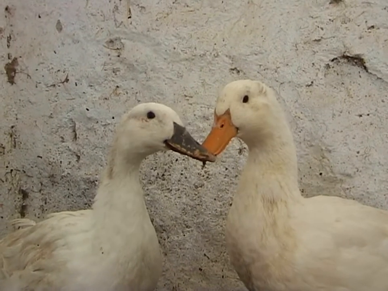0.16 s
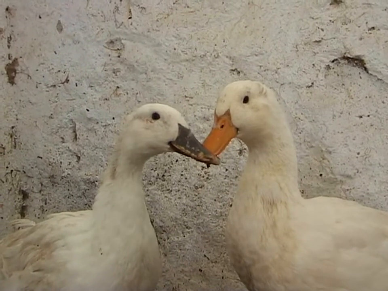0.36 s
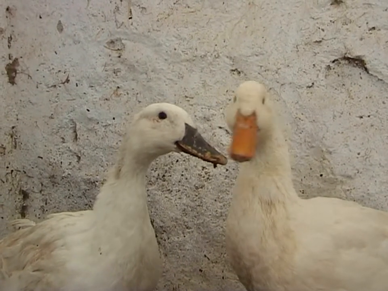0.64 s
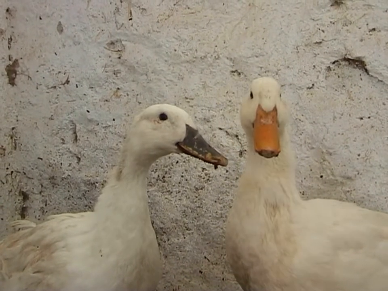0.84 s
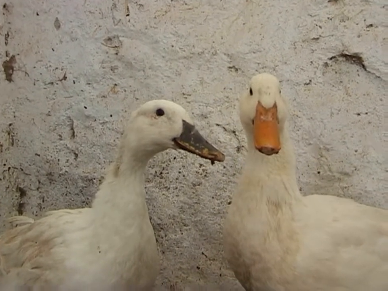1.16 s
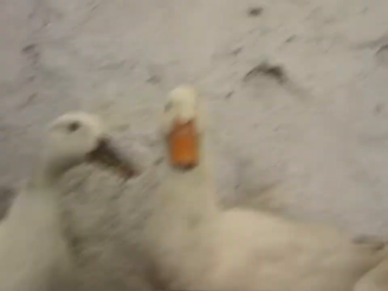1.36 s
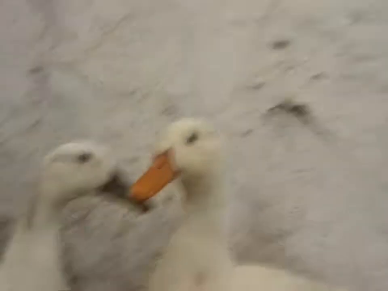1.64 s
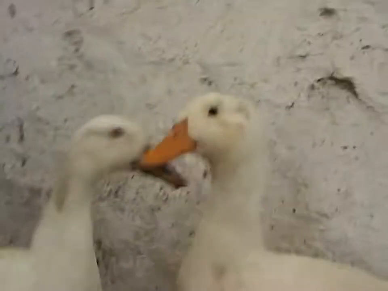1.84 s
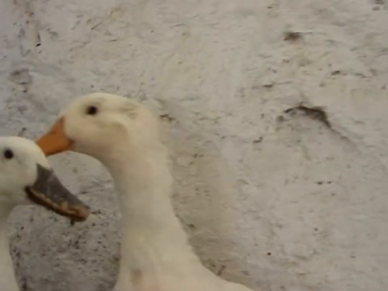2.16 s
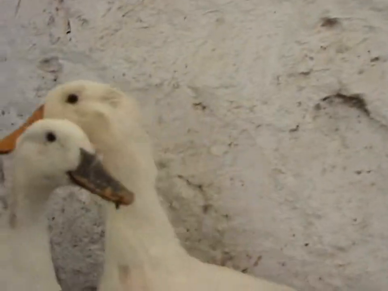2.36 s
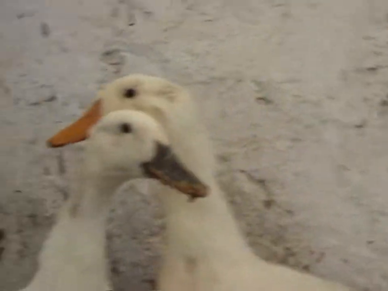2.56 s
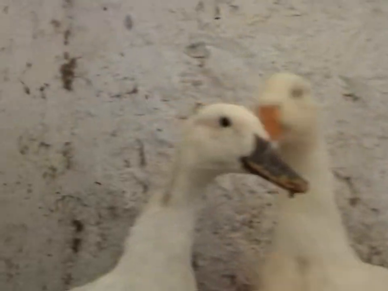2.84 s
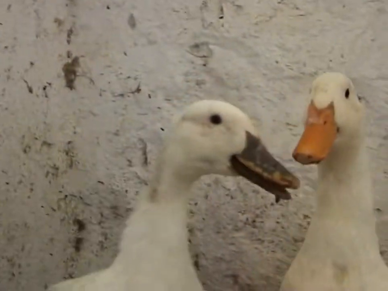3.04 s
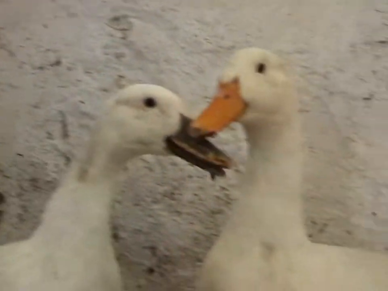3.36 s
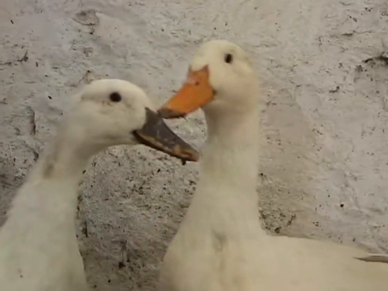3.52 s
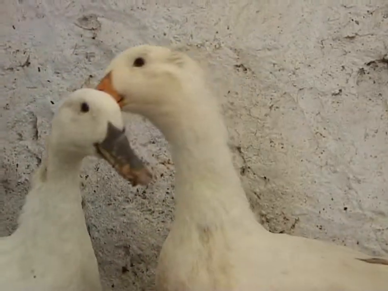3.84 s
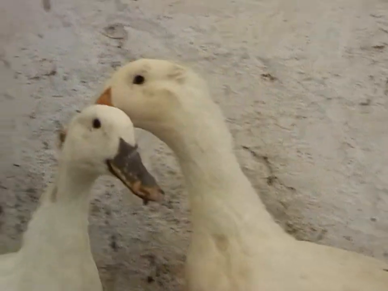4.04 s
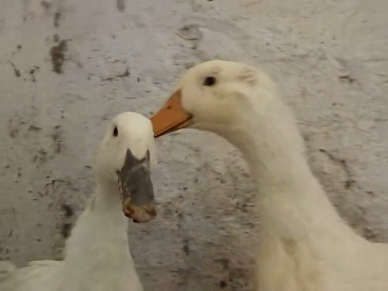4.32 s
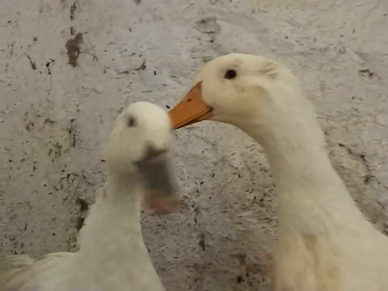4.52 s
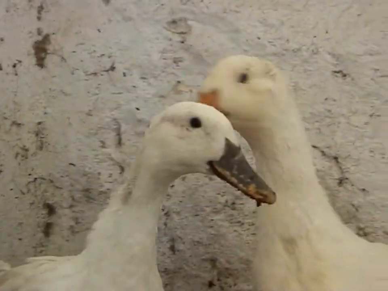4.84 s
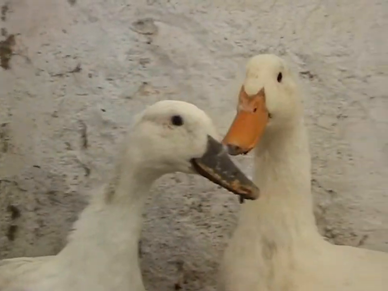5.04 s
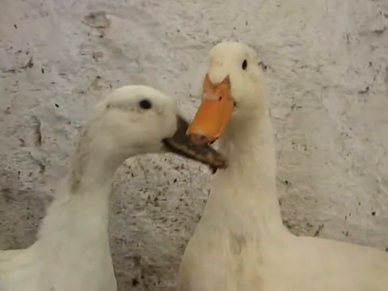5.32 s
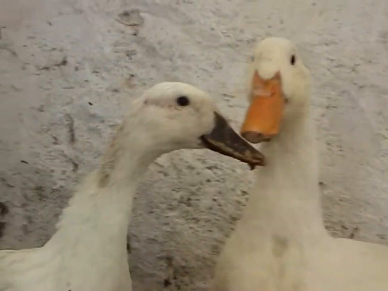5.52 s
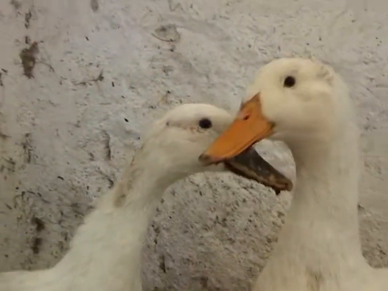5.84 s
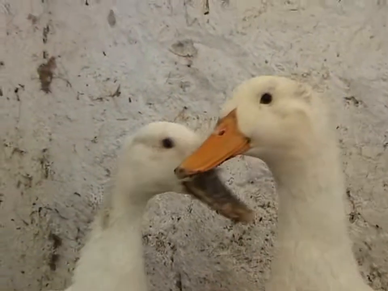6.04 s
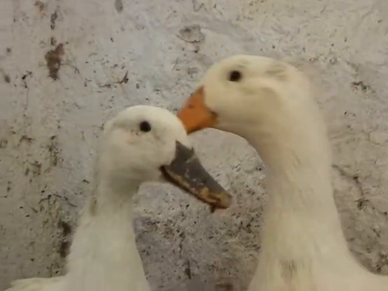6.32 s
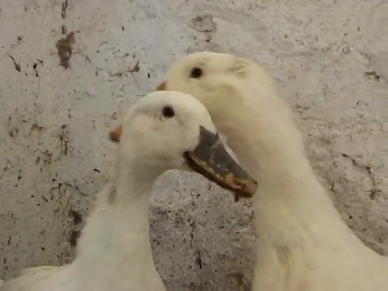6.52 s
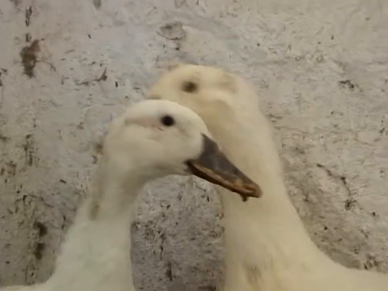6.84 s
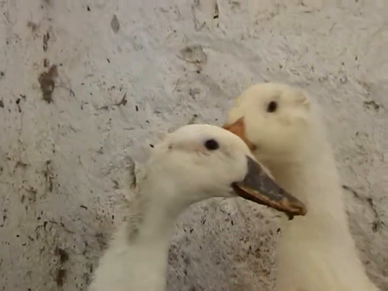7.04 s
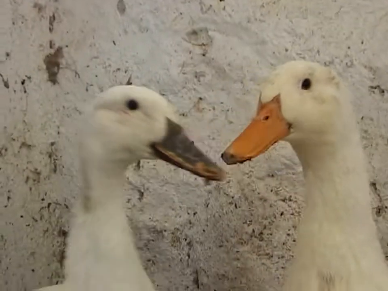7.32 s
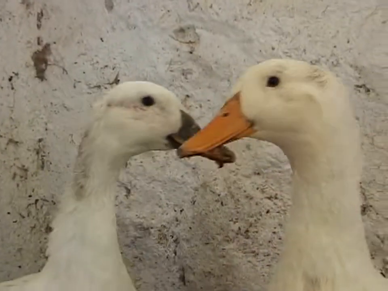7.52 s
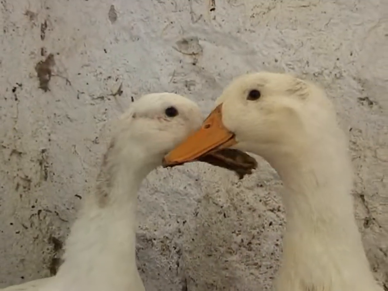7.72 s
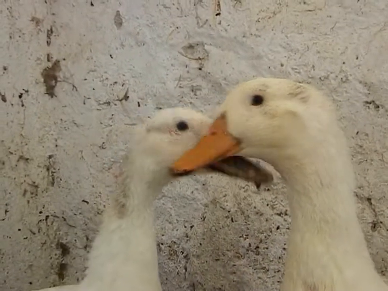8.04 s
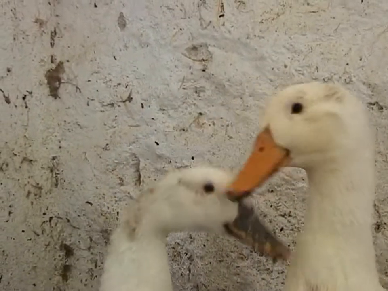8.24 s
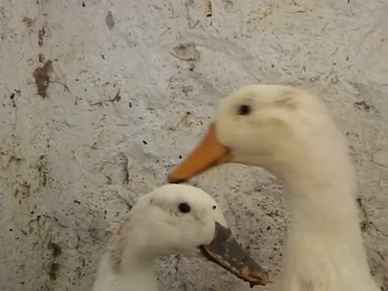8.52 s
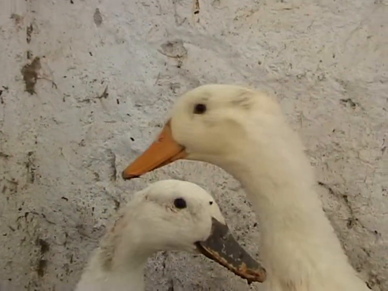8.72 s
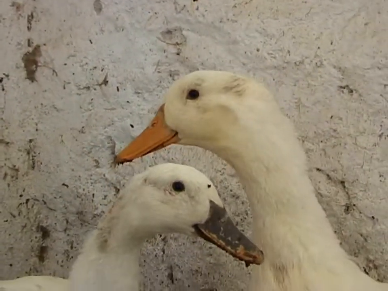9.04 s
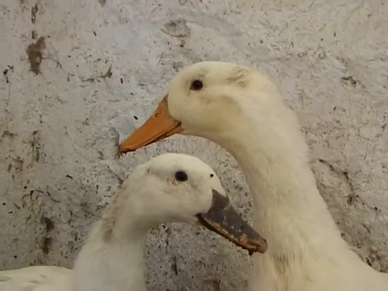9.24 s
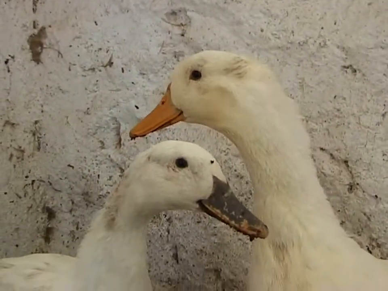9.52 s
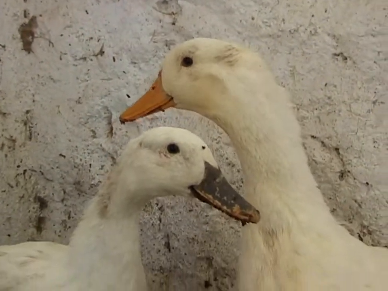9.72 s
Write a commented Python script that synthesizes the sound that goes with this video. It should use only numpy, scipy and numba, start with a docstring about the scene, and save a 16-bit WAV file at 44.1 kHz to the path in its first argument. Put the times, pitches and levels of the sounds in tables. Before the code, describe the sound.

Wind rumble and camera thumps give way to bright, brisk duck quacks in two bursts, interleaved with a drake's low breathy rasping, over faint hiss.

```python
"""A yard beside a plastered wall: a duck quacks in two runs, a drake answers with a quieter rasp.
Both voices are uneven membrane pulses and puffs of air through moving windpipe modes; the yard rings briefly.
Wind, thumps and rustling hands act on a small camera, whose electronics add hiss and two faint combs of tones.
Knocks and ticks are damped noise bursts; a far moan, a squeak and a hollow note are wavering sines,
and a narrow treble hiss is shaped noise."""
import sys
import numpy as np
from scipy import signal
from scipy.fft import rfft, irfft, next_fast_len
from scipy.io import wavfile
from scipy.ndimage import uniform_filter1d, map_coordinates
from numba import njit

SR = 44100
rng = np.random.default_rng(int(sys.argv[2]) if len(sys.argv) > 2 else 0)


def transcribe(u):
    """Save the signal u as a 16-bit wav file named by the first command-line argument.

    u: samples, shape (n,) or (channels, n), limited to [-1, 1]; the rate is SR.
    q: integer samples, one column per channel.
    """
    v = np.clip(np.atleast_2d(u).T, -1, 1)
    q = np.round(v * 32767).astype(np.int16)
    wavfile.write(sys.argv[1], SR, q)


N = 435708
T = np.arange(N) / SR
CALL_SAMPLES = SR // 5  # working length of one call


def undb(db):
    """Decibels to amplitude."""
    return 10 ** (np.asarray(db, float) / 20)


def unit(x):
    """Scale to an RMS of 1."""
    return x / np.sqrt(np.mean(x ** 2))


def ring(x, modes):
    """Sum of two-pole resonances, neighbours in opposite sign as in a pipe."""
    out = 0
    for k, (hz, width_hz, db) in enumerate(modes):
        b, a = signal.iirpeak(hz, hz / width_hz, SR)
        out = out + (-1) ** k * undb(db) * signal.lfilter(b, a, x)
    return out


def coloured(points):
    """Unit-RMS noise with a spectrum of (frequency [Hz], density [dB per Hz]) points."""
    hz, db = np.transpose(points)
    size = next_fast_len(N)
    bin_hz = np.arange(size // 2 + 1) * SR / size
    gain = undb(np.interp(np.log(bin_hz + 1e-3), np.log(hz), db))
    return unit(irfft(rfft(rng.standard_normal(size)) * gain, size)[:N])


def window(start_s, length_s, edge_s):
    """Gate with soft edges inside its length."""
    return np.clip(np.minimum(T - start_s, start_s + length_s - T) / edge_s, 0, 1)


def curve(table):
    """A gate open only inside the table, then its columns interpolated over time."""
    s, *columns = np.transpose(table)
    gate = window(s[0], s[-1] - s[0], 0.019)
    return [gate] + [np.interp(T, s, c) for c in columns]


def walk(rate_hz):
    """Slow smooth chance, spread near 1."""
    k = int(SR / rate_hz)
    steps = np.repeat(rng.standard_normal(N // k + 1), k)
    return 1.3 * uniform_filter1d(uniform_filter1d(steps, k), k)[:N]


def add(out, start_s, x):
    """Mix x into out at a time."""
    i = int(start_s * SR)
    out[i:i + len(x)] += x[:N - i]


def tone(hz, rms_db):
    """Sine of fixed or moving pitch."""
    return np.sqrt(2) * undb(rms_db) * np.sin(2 * np.pi * np.cumsum(hz) / SR)


# hiss spectrum: (frequency [Hz], density [dB per Hz])
FLOOR_COLOUR = [(36, -65.5), (41, -25.5), (60, -4), (87, -10), (299, -16), (475, -22), (775, -26),
                (2210, -34.5), (2370, -33), (2540, -35), (4230, -37.5), (5590, -38), (6580, -37.5),
                (15600, -41)]
FLOOR_DB = -65
CLOCK_HZ, CLOCK_DB = 263.78, -88.5
MOTOR_HZ, MOTOR_DB, MOTOR_CENTRE_HZ, MOTOR_FALL_DB_PER_KHZ = 300.03, -88.5, 5570, 4


def electronics():
    """Hiss, odd multiples of a clock tone, and a motor comb strongest in the mid treble."""
    out = undb(FLOOR_DB + .5 * walk(1.7)) * coloured(FLOOR_COLOUR)
    steady = np.ones(N)
    for k in range(3, 60, 2):
        partial = tone(k * CLOCK_HZ * steady, CLOCK_DB - .04 * k)
        out += np.roll(partial, k * k)  # spreads the phases
    for k in range(10, 38):
        db = MOTOR_DB - MOTOR_FALL_DB_PER_KHZ * abs(k * MOTOR_HZ - MOTOR_CENTRE_HZ) / 1000
        out += tone(k * MOTOR_HZ * steady, db + 3 * walk(2))
    return out


# wind on the microphone, strongest while the camera swings: (time [s], level before gusts [dB])
WIND_LEVEL = [(0, -54), (.7, -48), (1.02, -60), (1.24, -39.5), (1.72, -35), (1.88, -42), (2.1, -38.5),
              (2.45, -42), (2.55, -51.5), (3.6, -60), (4.35, -51.5), (5, -51.5), (5.7, -51), (6.05, -53.5),
              (6.9, -50.5), (8, -55.5), (9.88, -48.5)]
# wind spectrum: (frequency [Hz], density [dB per Hz])
WIND_COLOUR = [(3.5, -30), (6.0, 2.5), (16, 7), (32, -1.5), (77, -29), (160, -36), (210, -63), (400, -91)]
GUST_DB, GUSTS_PER_S = 5.5, 7.4


def wind():
    """Low turbulence noise straight on the microphone, its level wandering in gusts."""
    _, db = curve(WIND_LEVEL)
    return undb(db + GUST_DB * walk(GUSTS_PER_S)) * coloured(WIND_COLOUR)


def waver_and_flutter():
    """Slow random factors for the pitch and level of a faint tone."""
    return 1 + 0.0197 * walk(45), undb(2.5 * walk(30.33))


# moan notes: (time [s], length [s], pitch before waver [Hz],
#              first partial [dB], second partial [dB], fourth partial [dB])
MOAN_NOTES = [(.385, 0.12, 268, -68.5, -69, -88), (0.547, 0.36, 262, -77, -71, -83),
              (0.968, .18, 278, -85, -72, -76), (1.142, 0.13, 264, -80, -70, -74.5),
              (1.296, 0.3, 262, -78, -70, -75)]
MOAN_EDGE_S, MOAN_THIRD_DB = 0.019, -10  # third partial relative to the first


def moan():
    """A faint far moan in separate notes of four harmonics."""
    out = np.zeros(N)
    waver, flutter = waver_and_flutter()
    for s, length_s, hz, first_db, second_db, fourth_db in MOAN_NOTES:
        partials_db = [first_db, second_db, first_db + MOAN_THIRD_DB, fourth_db]
        note = sum(tone(k * hz * waver, db) for k, db in enumerate(partials_db, 1))
        out += window(s, length_s, MOAN_EDGE_S) * flutter * note
    return out


# growing bed of hands on the camera: (time [s], high part [dB], low part [dB]), before grain
RUSTLE_BED = [(.9, -97, -79), (1.22, -89, -79), (1.34, -74.5, -67.5), (1.7, -67, -65.5), (2.1, -68, -58)]
# finger rubs over that bed: (time [s], high part [dB], low part [dB]), before grain
FINGER_RUBS = [(1.25, -77, -78), (1.36, -59.5, -66), (1.63, -71, -62), (1.832, -55.5, -45.5),
               (1.99, -56, -56.5)]
RUB_RISE_MS, RUB_FALL_MS = 14, 48


def rustle():
    """Skin friction: grainy high and low noise, a growing bed with swelling rubs."""
    gate, high_db, low_db = curve(RUSTLE_BED)
    level = gate * undb([high_db, low_db])
    for s, *db in FINGER_RUBS:
        ms = (T - s) * 1000
        level = level + undb(db)[:, None] * np.exp(np.minimum(ms / RUB_RISE_MS, -ms / RUB_FALL_MS))
    grain = undb(1.3 * walk(90))
    high = coloured([(1500, -12), (2500, 4), (6000, -1), (10000, -0.5), (15000, -14)])
    low = coloured([(100, 3), (200, 4.5), (700, 2.0), (2200, -3.0), (3500, -33)])
    return grain * (level[0] * high + level[1] * low)


# thumps on the camera body: (time [s], level before the fade [dB], inverse of duration [Hz])
BODY_THUMPS = [(1.241, -38, 69), (1.354, -51, 70), (1.725, -25.5, 71), (1.94, -28, 69.4),
               (4.247, -37, 70.4)]


def thumps():
    """Each thump is one fading sine cycle, slightly faster at its start."""
    out = np.zeros(N)
    for s, db, hz in BODY_THUMPS:
        u = np.arange(int(SR / hz)) * hz / SR
        add(out, s - .004, undb(db) * np.sin(2 * np.pi * u ** 0.92) * (1 - u))
    return out


# narrow treble hiss: (time [s], level [dB])
HIGH_HISS_LEVEL = [(1.4, -92), (1.6, -70.5), (2.3, -67.5), (2.45, -76), (3.3, -100), (4.6, -80),
                   (5.32, -82), (5.5, -88), (6.2, -99)]


def high_hiss():
    """Noise in a narrow band around 11 kHz."""
    gate, db = curve(HIGH_HISS_LEVEL)
    colour = [(9000, -43.0), (10800, -2.5), (11800, 0.5), (12500, -9.5), (13500, -37.0)]
    return gate * undb(db) * coloured(colour)


# thin high ticks: (time [s], dry peak [dB], decay constant [ms])
TICK_TABLE = [(1.6994, -56, 4), (1.8514, -47, 4), (2.2035, -37, 4.4), (3.1143, -54, 4), (4.0294, -51, 4),
              (4.0544, -64, 4), (5.3467, -42, 3.7)]


def ticks():
    """Tiny bright snaps: short noise bursts through one broad treble resonance."""
    out, t = np.zeros(N), np.arange(SR // 20) / SR
    for s, db, decay_ms in TICK_TABLE:
        burst = rng.standard_normal(len(t)) * np.exp(-1000 * t / decay_ms)
        snap = ring(burst, [(10300, 7300, 0)])
        add(out, s, undb(db) * snap / np.max(abs(snap)))
    return out


# yard tail: (frequency [Hz], T60 [s], colour [dB])
YARD_TAIL = [(198, 0.78, -3), (503, 0.61, -2), (1390, 0.25, -2), (2180, 0.59, -10.5), (3680, 0.27, 0),
             (9700, 0.14, 4)]
YARD_DB, WALL_DB, WALL_MS = -9, -15.5, 2.8
AIR_DRIFT_MS = .1  # moving air blurs the echo paths


def yard(x):
    """Adds one echo off the near wall and a diffuse tail whose highest treble dies first."""
    t = np.arange(SR) / SR
    hz, t60_s, colour_db = np.transpose(YARD_TAIL)
    tail = 0
    for f in 150 * 2 ** np.arange(0, 7, .5):
        band_db = np.interp(np.log(f), np.log(hz), colour_db)
        band_t60_s = np.interp(np.log(f), np.log(hz), t60_s)
        noise = ring(rng.standard_normal(SR), [(f, f / 1.3, band_db)])
        tail = tail + noise * 1000 ** (-t / band_t60_s)
    tail = tail * np.clip(t / .03, 0, 1)
    response = undb(YARD_DB) * tail / np.sqrt(np.sum(tail ** 2))
    response[int(WALL_MS * SR / 1000)] += undb(WALL_DB)
    echo = signal.fftconvolve(x, response)[:N]
    read_s = T + AIR_DRIFT_MS / 1000 * walk(40)
    return x + map_coordinates(echo, [read_s * SR], order=3, mode="nearest")


def flaps(hz, weak, jitter, shimmer_db, puff_ms, slowing):
    """Uneven membrane pulses, the puff of turbulent air behind each, and ms since the last pulse."""
    period_chance, size_chance = rng.standard_normal((2, 80))
    air = rng.standard_normal(CALL_SAMPLES)
    count, i = np.arange(80), np.arange(CALL_SAMPLES)
    period = (1 + jitter * period_chance + slowing * count) * SR / hz
    at = (np.cumsum(period) - period[0]).astype(int)
    alternate = np.where(count % 2, 1 - np.clip(weak, 0, 1), 1)
    size = undb(shimmer_db * size_chance) * alternate
    inside = at < CALL_SAMPLES
    pulses = np.zeros(CALL_SAMPLES)
    pulses[at[inside]] = size[inside]
    u = np.arange(SR // 50) * 1000 / (puff_ms * SR)
    puffs = np.convolve(pulses, np.e * u * np.exp(-u))[:CALL_SAMPLES]
    age_ms = (i - at[np.searchsorted(at, i, "right") - 1]) * 1000 / SR
    return pulses, puffs * air, age_ms


def breath(length_ms, rise_ms, fall_ms, sag_db):
    """Pressure of one call: a quick rise, a hold that sags (or grows, if negative), a fall."""
    ms = np.arange(CALL_SAMPLES) * 1000 / SR
    rise = np.clip(ms / rise_ms, 0, 1)
    hold = undb(-sag_db * ms / length_ms)
    return rise * hold * np.exp(-np.maximum(ms - length_ms, 0) / fall_ms)


@njit
def moving_band_pass(x, hz, width_hz):
    """State-variable band-pass whose centre may move every sample."""
    y, b, l = np.empty(len(x)), 0., 0.
    for i in range(len(x)):
        g, k = np.tan(np.pi * hz[i] / SR), width_hz / hz[i]
        v = (b + g * (x[i] - l)) / (1 + g * (g + k))
        b, l, y[i] = 2 * v - b, l + 2 * g * v, k * v
    return y


def pipe(x, modes, stretch, shade_db=0):
    """Windpipe modes that follow the neck; each filters twice, so pulses swell softly."""
    out = 0
    shades_db = shade_db + np.zeros(len(modes))
    for k, ((hz, width_hz, db), more_db) in enumerate(zip(modes, shades_db)):
        once = moving_band_pass(x, hz * stretch, float(width_hz))
        twice = moving_band_pass(once, hz * stretch, float(width_hz))
        out = out + (-1) ** k * undb(db + more_db) * twice
    loudest = np.sort(out ** 2)[-SR // 20:]  # 50 ms of samples
    return out / np.sqrt(np.mean(loudest))


# drake calls: (time [s], level [dB], pulse rate [Hz], length [ms], upper pipe mode [dB],
#               brightness [dB], top air [dB], neck stretch [ratio])
RASP_CALLS = [(2.01, -42, 79.4, 200, -5, -14.5, -27, 0.87), (2.272, -31, 95.3, 63, -1, -6.5, -46, 1.08),
              (2.638, -32.5, 99.7, 81, -1.5, -7, -39, 1.04), (2.895, -30, 90.7, 86, -5, -8, -36, 1.1),
              (3.857, -33, 96.1, 113, -1, -4, -32, 1.03), (4.259, -33, 77.3, 81, 3.5, -11, -47, 1.03),
              (4.529, -33.5, 78.1, 79, 1.5, -8, -39, 1.005), (5.134, -36, 84.5, 47, 4, -7, -36.5, 1.05),
              (5.38, -28.0, 94.5, 67, -2.5, -6.5, -30, 1.073),
              (6.259, -39, 89.1, 24, -13, -10, -41.5, 0.67), (6.478, -33.5, 97.3, 130, -6, -6.5, -40, 1.07),
              (6.73, -33, 92, 73, 1.5, -4, -29, 1.014), (7.35, -30.5, 94.8, 106, -10, -4.5, -37.0, 0.99),
              (7.578, -30, 86.8, 127, -5, -4.5, -41, 1), (7.818, -34, 96.8, 89, -9, -2.5, -40, 1.05),
              (8.171, -33.5, 78.6, 81, -1, -5, -38, 1.003), (8.455, -32.5, 82.7, 53, 0, -4, -33, 1.03)]
# drake windpipe, low, bright and top-air groups: (frequency before stretch [Hz], width [Hz], level [dB])
DRAKE_LOW_MODES = [(1253, 260, -4), (1595, 150, 1.5), (1926, 130, 3.5)]
DRAKE_HIGH_MODES = [(2400, 400, 4.5), (3005, 210, -1.5), (3634, 260, -4.5), (4470, 330, -11),
                    (5130, 550, -8), (5600, 1100, -14.5), (6900, 2700, -25)]
DRAKE_TOP_MODES = [(8850, 550, -6), (11000, 1100, -3)]
DRAKE_SCOOP, DRAKE_SCOOP_MS = .22, 16  # the modes slide up as the bill opens


def drake():
    """Slow pulses; each ring slides up while the membranes close and is damped when they reopen."""
    out = np.zeros(N)
    ms = np.arange(CALL_SAMPLES) * 1000 / SR
    for s, db, hz, length_ms, upper_db, bright_db, top_db, neck in RASP_CALLS:
        pulses, air, age_ms = flaps(hz, 0, jitter=.04, shimmer_db=2.2, puff_ms=2.6, slowing=.004)
        push = breath(length_ms, rise_ms=34.7, fall_ms=11, sag_db=5.5)
        opening = 1 - DRAKE_SCOOP * np.exp(-ms / DRAKE_SCOOP_MS)
        stretch = neck * opening * (1.04 - .16 * np.exp(-age_ms / 3))
        closed = np.clip(age_ms / 2.2, .3, 1) * np.clip((10.5 - age_ms) / 2.5, .4, 1)
        source = pulses + .1 * air
        voice = pipe(push * source, DRAKE_LOW_MODES, stretch, np.array([0, 0, upper_db]))
        voice += undb(bright_db) * pipe(push ** 2 * source, DRAKE_HIGH_MODES, np.sqrt(neck * stretch))
        voice += undb(top_db) * pipe(push ** 2 * air, DRAKE_TOP_MODES, neck * np.ones(CALL_SAMPLES))
        add(out, s - .008, undb(db) * voice * uniform_filter1d(closed, size=30))
    return out


WHISTLE_HZ, WHISTLE_HZ_PER_MS = 850.7, 3.6  # a longer lead-in starts higher


def lead_in_whistle(lead_ms):
    """A soft tone that swells and sinks in pitch until the membranes catch."""
    u = np.linspace(0, 1, int((lead_ms + 12) * SR / 1000))
    hz = WHISTLE_HZ + WHISTLE_HZ_PER_MS * lead_ms
    waver = .7 * uniform_filter1d(rng.standard_normal(4000), size=90)[:len(u)]
    phase = 2 * np.pi * np.cumsum(hz * (1.05 - .12 * u ** 2 + waver)) / SR
    swell = np.sin(np.pi * u ** 1.4) * u ** 1.5
    return (np.sin(phase) + 0.17 * u * np.sin(2 * phase)) * swell


# duck calls: (time [s], level [dB], weakening of every other pulse [0-1], chest mode [Hz],
#              lowest pipe mode [dB], highest pipe mode [dB], bill brightness [dB],
#              neck stretch [ratio], whistle length less 12 ms [ms], whistle re quack [dB])
QUACK_CALLS = [(2.141, -24, 0.2, 300, -4, -16, -13, 1.056, 40.5, 4),
               (2.415, -20, .56, 267, -13.5, -24, -11, 1.01, 27, -1),
               (2.705, -21.5, 0.87, 293, -14.5, -12, -12.5, 1.005, 14.7, 2),
               (3.001, -22, 0.76, 293, -15.5, -19, -10.5, 1.05, 12, 2),
               (3.301, -19, 0.4, 285, -13.5, -8.5, -12, 1.025, 55, -11),
               (3.619, -20, .65, 291, -8.5, -11, -11.5, 1.035, 55, -3.5),
               (3.926, -21.5, 0.35, 310, -16.5, -17.5, -12, 1.018, 14, 3.5),
               (4.679, -21.5, 0.36, 293, -8.5, -7, -12.5, 1.013, 20.5, 4),
               (4.932, -19.5, 0.66, 307, -9, -10, -11.5, 1.026, 7.4, 2.5),
               (5.21, -19, 0.45, 290, -10, -3, -12, 1.052, 12, -2.5),
               (6.283, -25, 0, 272, -5, -2.5, -12, 1.01, 24, 0),
               (6.548, -23, 0.76, 303, -7.5, -20, -10.5, 1.022, 17, 0),
               (7.142, -21.5, 0.55, 215, -10, -9, -13.5, 1.003, 13.3, 6.5),
               (7.38, -19.5, 0.37, 207, -9, -4, -11, .984, 11, 4),
               (7.655, -21, 0.55, 210, -4.5, -11, -11.5, 1.04, 20, 5),
               (7.953, -21.5, 0.46, 230, -4.5, -9, -14, 1.066, 30.6, 3),
               (8.354, -21, 0.57, 215, -7.5, 3.5, -8.5, 1.007, 12.1, 5.5)]
# duck windpipe, low, bright and top-air groups: (frequency before stretch [Hz], width [Hz], level [dB])
DUCK_LOW_MODES = [(829.6, 163, 8.5), (1174, 360, 3.5), (1349, 201, 4), (1730, 272, 7), (2162, 260, 3)]
DUCK_HIGH_MODES = [(2814, 580, 8), (3380, 210, 0.5), (3840, 450, 7.5), (4387, 260, 2.5), (5040, 640, 2.5),
                   (5685, 480, -1), (6730, 810, -5)]
DUCK_TOP_MODES = [(7500, 2900, 4), (10600, 6100, -22.5), (13400, 3400, -14.5)]
# duck throat, unmoved by the neck: (frequency [Hz], width [Hz], level [dB])
DUCK_THROAT_MODES = [(480.7, 91, 0.91), (609.4, 90, -1.9)]
QUACK_HZ, PITCH_SPREAD = 232.14, .012
MEAN_QUACK_MS, MS_PER_DB = 46.8, 3  # a stronger quack lasts longer
CHEST_DB, MIDDLE_MODE_DB = -18.5, 0
TOP_AIR_DB, TOP_PER_BRIGHT = -10.5, 1.19  # top air rises with the brightness of the bill
SINK_PER_S = .3


def duck():
    """Each quack: a soft whistle while pressure builds, then paired pulses through the windpipe."""
    out = np.zeros(N)
    t = np.arange(CALL_SAMPLES) / SR
    still = np.ones(CALL_SAMPLES)
    mean_db = np.mean(QUACK_CALLS, axis=0)[1]
    for s, db, weak, chest_hz, low_db, high_db, bright_db, neck, lead_ms, lead_db in QUACK_CALLS:
        hz = QUACK_HZ * (1 + PITCH_SPREAD * rng.standard_normal())
        length_ms = MEAN_QUACK_MS + MS_PER_DB * (db - mean_db)
        top_db = TOP_AIR_DB + TOP_PER_BRIGHT * bright_db
        pulses, air, _ = flaps(hz, weak, jitter=.025, shimmer_db=1.8, puff_ms=1.8, slowing=.002)
        push = breath(length_ms, rise_ms=18, fall_ms=8, sag_db=1.5)
        late = breath(length_ms, rise_ms=21, fall_ms=7.8, sag_db=-0.5)  # treble grows as the bill opens
        # modes scoop up, then sink as the bill closes
        stretch = neck * (1 - 0.098 * np.exp(-t / 0.013) - SINK_PER_S * t)
        voiced = push * (pulses + .06 * air)
        shade_db = np.array([low_db, (low_db + MIDDLE_MODE_DB) / 2, MIDDLE_MODE_DB, 0, high_db])
        chest_modes = [(chest_hz, 150, 0), (135, 55, -9)]
        voice = pipe(voiced, DUCK_LOW_MODES, stretch, shade_db)
        voice += undb(CHEST_DB) * pipe(push * (pulses + 0.16 * air), chest_modes, still)
        voice += undb(CHEST_DB) * pipe(voiced, DUCK_THROAT_MODES, still)
        voice += undb(bright_db) * pipe(late * (pulses + 0.1 * air), DUCK_HIGH_MODES, stretch)
        voice += undb(top_db) * pipe(late * air, DUCK_TOP_MODES, stretch)
        add(out, s - .010, undb(db) * voice)
        whistle = lead_in_whistle(lead_ms)
        add(out, s + 0.0092 - len(whistle) / SR, undb(db + lead_db) * whistle)
    return out


# thin squeak: (time [s], pitch before waver [Hz])
SQUEAK_PITCH = [(3.38, 12300), (3.445, 12550), (3.482, 12150), (3.53, 12250), (3.55, 11980), (3.61, 12350)]
SQUEAK_DB = -80


def squeak():
    """A thin wavering sine high in the treble."""
    gate, hz = curve(SQUEAK_PITCH)
    _, flutter = waver_and_flutter()
    return gate * flutter * tone(hz * (1 + 0.003 * walk(47)), SQUEAK_DB)


# small knocks close by: (time [s], dry peak [dB], resonance [Hz], burst decay constant [ms])
KNOCK_TABLE = [(4.248, -35.5, 875, 10), (6.235, -33, 880, 14), (7.093, -37.5, 203, 23),
               (7.338, -37, 1250, 8.7), (8.32, -34.5, 202, 5)]


def knocks():
    """Noise bursts through two broad resonances, with a faint click on top."""
    out, t = np.zeros(N), np.arange(SR // 10) / SR
    for s, db, hz, decay_ms in KNOCK_TABLE:
        burst = rng.standard_normal(len(t)) * np.exp(-1000 * t / decay_ms)
        tap = ring(burst, [(hz, hz / 0.99, 0), (3 * hz, 1.9 * hz, -12)]) + undb(-49.5) * burst
        add(out, s, undb(db) * tap / np.max(abs(tap)))
    return out


NOTE_S, NOTE_LENGTH_S, NOTE_START_HZ, NOTE_SAG_HZ_PER_S = 5.49, 0.236, 744, 136
NOTE_START_DB, NOTE_FADE_DB_PER_S = -56.5, 65


def hollow_note():
    """A short sine after the first run of quacks, fading and sinking."""
    waver, flutter = waver_and_flutter()
    age_s = np.clip(T - NOTE_S, 0, 1)
    hz = (NOTE_START_HZ - NOTE_SAG_HZ_PER_S * age_s) * waver
    note = tone(hz, NOTE_START_DB - NOTE_FADE_DB_PER_S * age_s)
    return window(NOTE_S, NOTE_LENGTH_S, 0.016) * flutter * note


def scene():
    """Sources in the yard with its echo; the rest dry."""
    in_yard = yard(ticks() + drake() + duck() + knocks())
    on_camera = electronics() + wind() + rustle() + thumps()
    faint = moan() + high_hiss() + squeak() + hollow_note()
    return (in_yard + on_camera + faint)[None]


TOP_HZ = 15790


def record(dry):
    """The camera cuts the top steeply."""
    low_pass = signal.ellip(12, .2, 60, TOP_HZ, fs=SR, output="sos")
    return signal.sosfilt(low_pass, dry)


dry = scene()
out = record(dry)
transcribe(out)
```